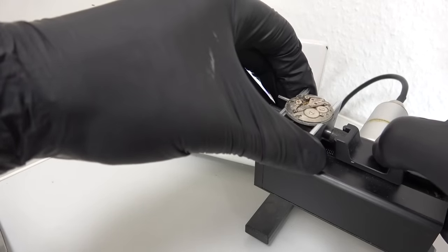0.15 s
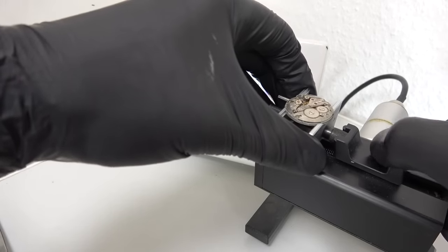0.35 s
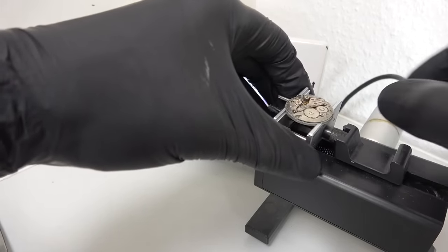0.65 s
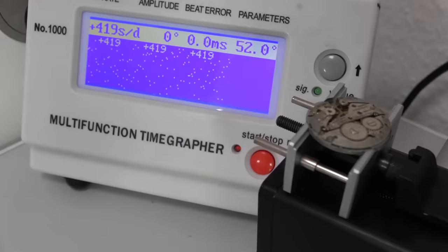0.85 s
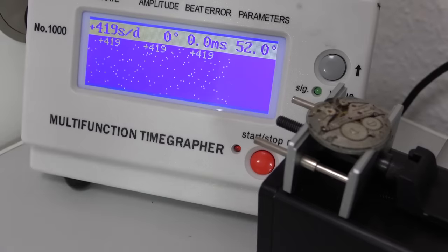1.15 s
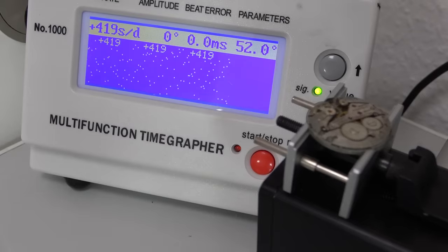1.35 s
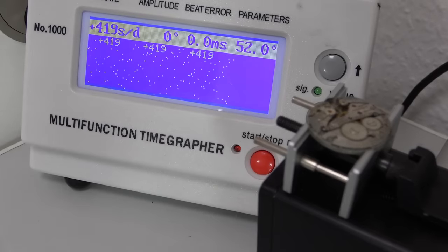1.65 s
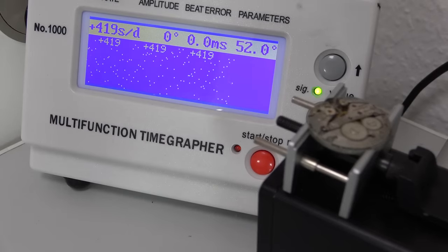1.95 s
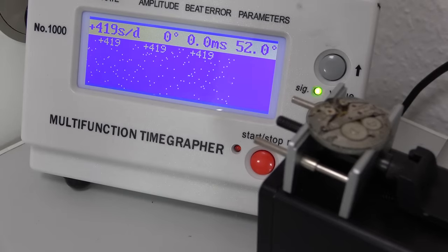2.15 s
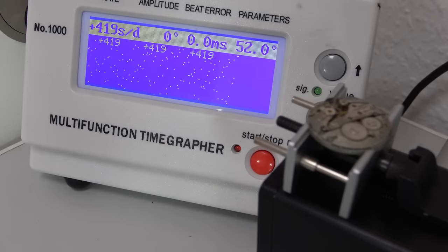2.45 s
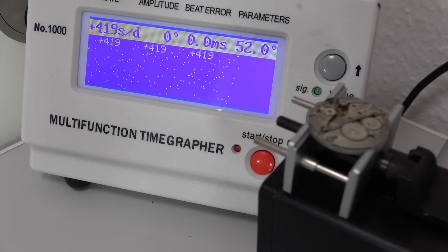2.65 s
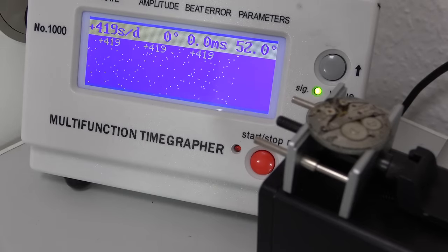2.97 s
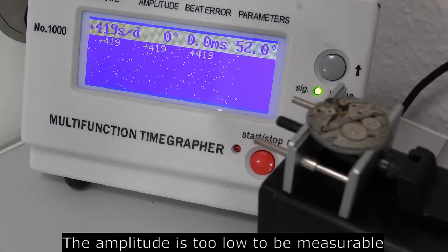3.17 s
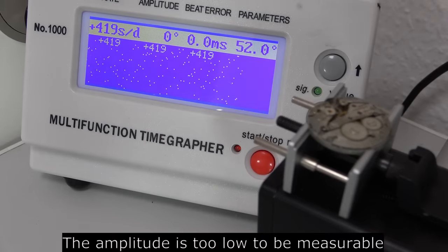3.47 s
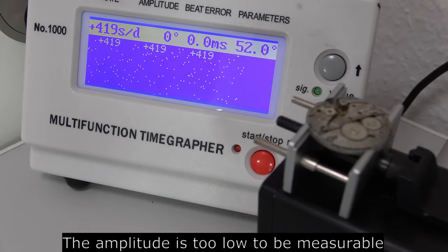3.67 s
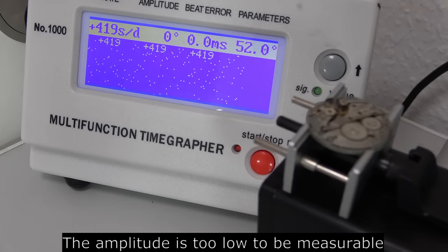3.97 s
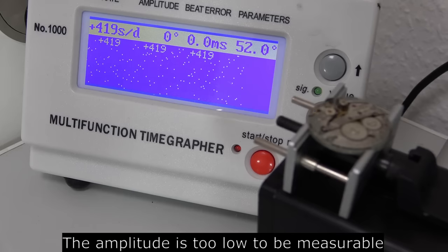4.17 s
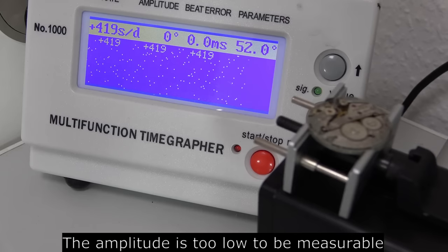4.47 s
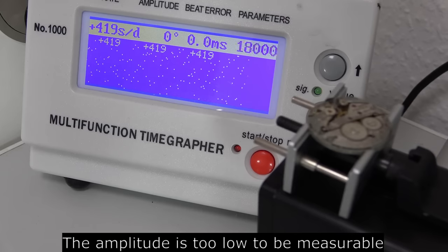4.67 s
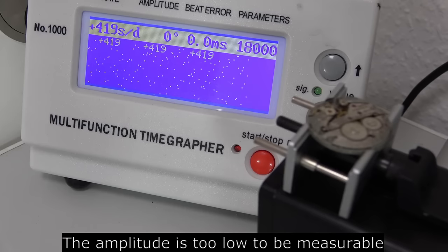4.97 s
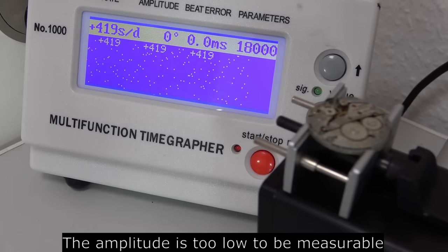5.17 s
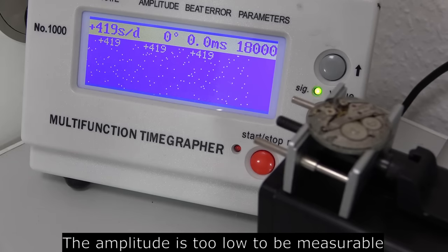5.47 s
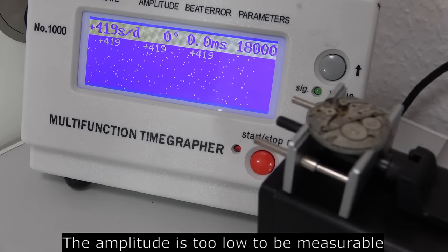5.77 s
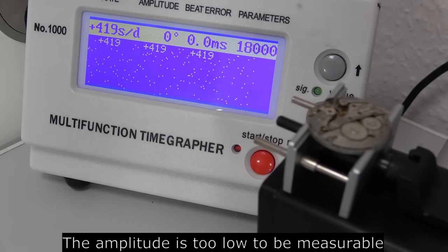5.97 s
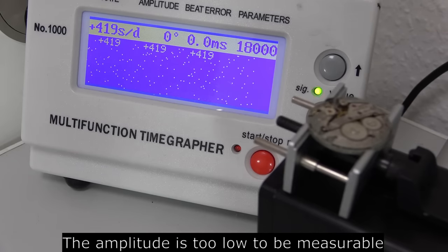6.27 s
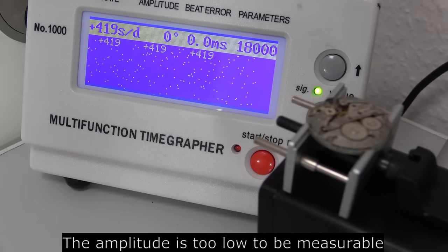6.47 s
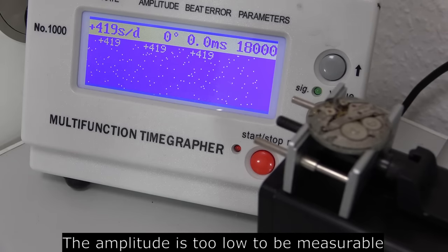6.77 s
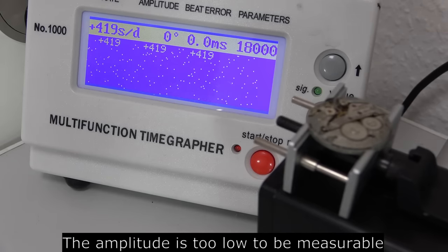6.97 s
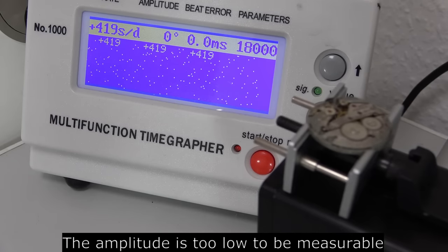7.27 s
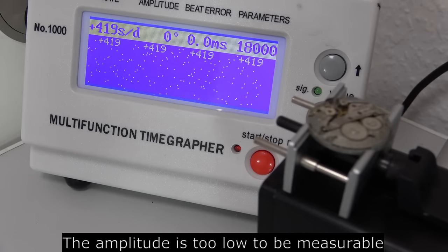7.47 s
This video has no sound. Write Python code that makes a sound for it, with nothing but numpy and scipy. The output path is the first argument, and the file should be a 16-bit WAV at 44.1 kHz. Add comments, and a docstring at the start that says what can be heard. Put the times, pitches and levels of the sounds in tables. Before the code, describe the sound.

After a snap and brief glove rubbing, a watch testing device follows a watch's faint ticks with fast, sharp pips in a small room.

```python
"""Watch on a timegrapher

A clamp snaps shut on a watch movement and a rubber glove hisses off the stand. The scene then jumps
to the running test: about five times a second the steel escapement clicks faintly, and the tester's
buzzer, kicked by a few electric pulses, answers with a sharp pip that rings on in a small room.
Air and a low hum lie underneath, and two early nudges set the microphone's support rumbling."""
import sys
import numpy as np
from scipy import signal
from scipy.fft import rfft, irfft
from scipy.io import wavfile
from scipy.ndimage import uniform_filter1d

SR = 44100
rng = np.random.default_rng(int(sys.argv[2]) if len(sys.argv) > 2 else 0)


def transcribe(u):
    """Save the signal u as a 16-bit wav file named by the first command-line argument.

    u: samples, shape (n,) or (channels, n), limited to [-1, 1]; the rate is SR.
    q: integer samples, one column per channel.
    """
    v = np.clip(np.atleast_2d(u).T, -1, 1)
    q = np.round(v * 32767).astype(np.int16)
    wavfile.write(sys.argv[1], SR, q)


N = 336042

# Colour of the room's air. Each row: frequency in Hz, relative level in dB.
AIR_COLOUR = [(20, -0.5), (45, 3.5), (100, -1.5), (160, 0), (290, -1), (420, -10.5), (750, -9), (1100, -14),
              (1800, -19.5), (3000, -25.5), (6000, -27), (9500, -29), (12000, -32.5), (15500, -32)]
# Hum of an appliance. Each row: frequency in Hz, level in dB.
HUM_TONES = [(122.5, -74.5), (279, -74), (500.6, -80), (711, -67.5), (780.6, -83.5), (1276, -89),
             (1545, -72.5)]
# The room's tail. Each row: frequency in Hz, seconds to fall 60 dB.
ROOM_DECAY = [(300, 0.21), (1500, 0.6), (2400, 0.43), (3800, 0.51), (4900, 0.35), (7000, 0.32),
              (14000, 0.35)]
# Nudges to the microphone's support. Each row: start in seconds, push length in seconds, level in dB.
SUPPORT_NUDGES = [(.011, .16, -33.5), (.614, 0.075, -43)]
# Colour of rubber on plastic. Each row: frequency in Hz, relative level in dB.
RUB_COLOUR = [(880, -37), (1500, -9), (1750, -5), (2920, -13), (3540, -5.5), (4350, -4.5), (5720, -5),
              (8710, -7), (15500, -16)]
# Glove strokes. Each row: firmest moment in seconds, relative level in dB, swell and fade in seconds.
GLOVE_STROKES = [(.036, -54.5, .004, 0.033), (.53, -57.5, 0.056, 0.13), (.75, -61, 0.021, 0.045)]
# Resonances of the stand. Each row: centre in Hz, width in Hz, relative level in dB.
STAND_RESONANCES = [(350, 180, 3), (2540, 740, -2), (5700, 320, -1), (8750, 1400, -4.5)]
# Knocks of clamp and movement. Each row: start in seconds, peak in dB, treble cutoff in Hz.
CLAMP_KNOCKS = [(0.0353, -41, 7860), (0.0733, -23, 6750), (0.1859, -49, 7000), (0.604, -42.5, 3600),
                (.627, -45, 6560), (.6815, -48, 5000), (0.732, -44.5, 7000)]
# Ring of the clamp. Each row: frequency in Hz, relative level in dB, seconds to fall 60 dB.
CLAMP_MODES = [(77.5, -16, 0.22), (376, -12, 0.058), (1150, -13.5, 0.051), (1370, -8, 0.024),
               (1496, -5, 0.038), (1557, -16, 0.21), (2100, -4, 0.0085), (2780, -4, 0.021),
               (3590, 3, 0.0069), (4950, -3, 0.0076), (5650, -8, .01), (6410, -4, 0.01), (8500, -8, 0.0087),
               (13500, 7, .008)]
# Uneven running of the weak movement. Each row: time in seconds, lag behind an even beat in seconds.
BEAT_WANDER = [(0.76, 0.0023), (1.38, 0.0078), (1.59, -0.0002), (1.8, 0.0041), (2.62, -0.0052),
               (2.83, -0.0111), (3.03, -0.003), (3.65, -0.0061), (3.86, 0.0049), (4.48, 0.0136),
               (4.89, 0.0105), (5.1, 0.013), (5.72, 0.005), (5.92, -0.0024), (6.13, -0.0036),
               (6.34, 0.0014), (6.95, -0.0065), (7.57, -0.0042)]
# Ring of the escapement's tiny steel parts. Each row: centre in Hz, width in Hz, relative level in dB.
STEEL_RESONANCES = [(6500, 1500, -24), (9240, 2400, -14), (11800, 1100, -17), (13700, 1400, -14),
                    (14900, 790, -9.5)]
# The buzzer in its plastic case. Each row: centre in Hz, width in Hz, relative level in dB.
BUZZER_RESONANCES = [(493, 300, -31.5), (1463, 198, -15), (2040, 148, -12), (2475, 366, -4.5),
                     (3090, 178, 1.5), (3874, 178, -2.5), (4683, 525, -14.5), (5365, 220, -11.5),
                     (6394, 136, -26), (7603, 340, -25.5), (8715, 300, -28), (11240, 1050, -41.5),
                     (12740, 290, -27), (13740, 556, -51)]
# The buzzer faces away, so most of it arrives off wall and bench.
# Each row: delay in seconds, relative level in dB.
BUZZER_PATHS = [(0.0, -14.5), (0.001481, 3.5), (0.001966, 4), (0.002191, -0.5), (0.003119, 0.8),
                (0.003229, 1.6), (0.003325, -9), (0.004506, -4.5), (0.006981, -7.5), (0.007804, -11.5),
                (0.0112, -9)]
# What the buzzer throws all round the room. Each row: centre in Hz, width in Hz, relative level in dB.
BUZZER_SPILL = [(520, 300, -48.5), (1270, 730, -29.5), (2100, 710, -17.5), (2291, 210, -0.5),
                (2472, 394, -2), (2925, 690, -18), (3950, 630, -20.5), (4627, 870, -12), (4960, 290, -10.5),
                (5320, 510, -26.5), (7250, 5100, -38), (12600, 3800, -40.5)]

FIRST_BEAT_S, BEAT_S, LIMP_S = .765, .2063, .0084  # every second beat is late by the limp
UNLOCK_LEAD_S, DROP_LAG_S, DROP_JITTER_S = .029, .033, .004  # the two clicks around each beat
EARLY_BEATS, EARLY_S = (13, 17), .0251  # on these beats, from 0, the tester fires at the unlocking click


def gain_of(db):
    """Decibels to a gain."""
    return 10 ** (np.asarray(db) / 20)


def unit_rms(x):
    """Scales to rms 1."""
    return x / np.sqrt(np.mean(x ** 2) + 1e-20)


def curve_at(points, hz):
    """Reads a table on a log-frequency axis."""
    f, value = np.transpose(points)
    return np.interp(np.log(hz + 1), np.log(f + 1), value)


def add(mix, start_s, sound):
    """Lays a sound into the mix."""
    part = mix[max(round(start_s * SR), 0):][:len(sound)]
    part += sound[:len(part)]


def noise(colour):
    """Steady noise of rms 1 with the given colour."""
    gains = gain_of(curve_at(colour, np.fft.rfftfreq(N, 1 / SR)))
    return unit_rms(irfft(rfft(rng.standard_normal(N)) * gains, N))


def ring(resonances, size=4096, order=2):
    """A resonant body's answer to one tap; a higher order steepens the skirts of its peaks."""
    hz = abs(np.fft.fftfreq(size, 1 / SR))
    power = sum(gain_of(db) ** 2 / (1 + (2 * (hz - f) / width) ** 2) ** order
                for f, width, db in resonances)
    log_gain = np.log(power + 1e-14) / 2
    return np.fft.ifft(np.exp(np.conj(signal.hilbert(log_gain)))).real  # minimum phase


def delayed(x, delays_s, gains):
    """Stacks delayed copies of a short sound."""
    hz = np.fft.rfftfreq(len(x), 1 / SR)
    comb = gains @ np.exp(-2j * np.pi * np.outer(delays_s, hz))
    return irfft(rfft(x) * comb, len(x))


def room(x, predelay_s=0.0041, build_s=0.0049):
    """Small-room reverb: dense reflections build up, then each band dies at its own speed."""
    taps = rng.choice([-1., 1.], SR) * (rng.random(SR) < .2)
    hz, t, bands = signal.stft(taps, SR, nperseg=256)
    decay = gain_of(-60 * t / curve_at(ROOM_DECAY, hz)[:, None])
    tail = signal.istft(bands * decay, SR, nperseg=256)[1]
    tail *= np.clip((np.arange(len(tail)) / SR - predelay_s) / build_s, 0, 1)
    return signal.fftconvolve(x, tail / np.linalg.norm(tail))[:N]


def room_tone(air_db=-58.5, waver=0.747):
    """The bed: room air and the hum of an appliance, whose higher tones waver more."""
    t = np.arange(N) / SR
    out = gain_of(air_db) * noise(AIR_COLOUR)
    knots = np.linspace(0, t[-1], 150)
    for hz, db in HUM_TONES:
        drift = np.interp(t, knots, np.cumsum(rng.standard_normal(len(knots))))
        phase = 2 * np.pi * hz * t + waver * (hz / 1000) ** 2 * drift
        out += gain_of(db) * np.sqrt(2) * np.sin(phase)
    return out


def support_sway(hz=18.0, settle_s=0.15):
    """Sub rumble: each nudge rocks the microphone's support, which swings at its own rate and settles."""
    t, out = np.arange(2 * SR) / SR, np.zeros(N)
    for start, push, db in SUPPORT_NUDGES:
        swing = np.minimum(t / push, 1) * np.exp(-np.maximum(t - push, 0) / settle_s)
        add(out, start, gain_of(db) * swing * np.sqrt(2) * np.sin(2 * np.pi * hz * t))
    return out


def glove(grain_db=-1.5, hiss_db=1.0, slips_per_s=200, slip_db=-3):
    """Rubber hisses over plastic in strokes that swell and fade; its tiny uneven slips tap the stand."""
    t = np.arange(N) / SR
    grip = unit_rms(uniform_filter1d(rng.standard_normal(N), size=130))
    hiss = unit_rms(noise(RUB_COLOUR) * gain_of(grain_db * grip))
    slips = (rng.random(N) < slips_per_s / SR) * rng.standard_normal(N)
    taps = unit_rms(signal.oaconvolve(slips, ring(STAND_RESONANCES))[:N])
    strokes = sum(gain_of(db) * np.exp(-np.maximum((firmest - t) / swell, (t - firmest) / fade))
                  for firmest, db, swell, fade in GLOVE_STROKES)
    return strokes * (gain_of(hiss_db) * hiss + gain_of(slip_db) * taps)


def clamp(crack_gain=0.98, crack_s=0.0026, room_db=-18):
    """Each knock is a brief crack over the short ring of the clamp, with its own brightness."""
    t, out = np.arange(8192) / SR, np.zeros(N)
    for start, peak_db, cutoff_hz in CLAMP_KNOCKS:
        body = sum(gain_of(db - 60 * t / t60) * np.sin(2 * np.pi * (hz * t + rng.random()))
                   for hz, db, t60 in CLAMP_MODES)
        crack = crack_gain * np.exp(-t / crack_s) * rng.standard_normal(len(t))
        knock = signal.sosfilt(signal.butter(2, cutoff_hz, fs=SR, output="sos"), body + crack)
        add(out, start, gain_of(peak_db) * knock / abs(knock).max())
    return out + gain_of(room_db) * room(out)


def beat_times():
    """The watch's rhythm in seconds: an even count, a limp between tick and tock, and a slow wander."""
    even = np.arange(FIRST_BEAT_S, N / SR, BEAT_S)
    limp = LIMP_S * (np.arange(len(even)) % 2)
    return even + limp + np.interp(even, *np.transpose(BEAT_WANDER))


def escapement(unlock_db=-61, drop_db=-53.5, spread_db=3, chatter_s=0.00095, settle_s=0.006, room_db=-9):
    """A faint steel click as the pallet unlocks, then a stronger, uneven one as the wheel drops on it."""
    t, clicks = np.arange(1024) / SR, np.zeros(N)
    envelope = np.exp(-t / chatter_s) + 0.15 * np.exp(-t / settle_s)
    for beat in beat_times():
        unlock, drop = envelope * rng.standard_normal((2, len(t)))
        lag, force = rng.standard_normal(2)
        add(clicks, beat - UNLOCK_LEAD_S, gain_of(unlock_db) * unlock)
        add(clicks, beat + DROP_LAG_S + DROP_JITTER_S * lag, gain_of(drop_db + spread_db * force) * drop)
    steel = ring(STEEL_RESONANCES)
    ticks = signal.oaconvolve(clicks, steel / np.linalg.norm(steel))[:N]
    return ticks + gain_of(room_db) * room(ticks)


def buzzer(pulses=3, drive_hz=2360.7, peak_db=-8, low_cut_hz=300, room_db=-16):
    """The lead sound: every beat fires the same few electric pulses into the buzzer, making a pip."""
    pip = delayed(ring(BUZZER_RESONANCES), np.arange(pulses) / drive_hz, np.ones(pulses))
    low_cut = signal.butter(2, low_cut_hz, "high", fs=SR, output="sos")  # too small to radiate bass
    path_s, path_db = np.transpose(BUZZER_PATHS)
    pip = delayed(signal.sosfilt(low_cut, pip), path_s, gain_of(path_db))
    pip *= gain_of(peak_db) / abs(pip).max()
    spill = unit_rms(ring(BUZZER_SPILL, order=4)) * pip.std()
    close, room_send = np.zeros((2, N))
    for number, beat in enumerate(beat_times()):
        start = beat - EARLY_S * (number in EARLY_BEATS)
        add(close, start, pip)
        add(room_send, start, spill)
    turn = np.linspace(0, np.pi, N)  # the reflections drift slowly through three patterns
    crossfades = np.maximum(np.cos(turn), 0), np.sin(turn), np.maximum(-np.cos(turn), 0)
    return close + gain_of(room_db) * sum(fade * room(room_send) for fade in crossfades)


def scene(jump_s=.78, crossfade_s=.006):
    """Handling first, then an abrupt jump into the running test, over one unbroken bed; mono."""
    jump = np.clip((np.arange(N) / SR - jump_s) / crossfade_s, 0, 1)
    handling = clamp() + glove()
    testing = buzzer() + escapement()
    return ((1 - jump) * handling + jump * testing + support_sway() + room_tone())[None]


def record(dry, cutoff_hz=16000):
    """A steep high cut takes the very top off the mix."""
    high_cut = signal.firwin(511, cutoff_hz, window=("kaiser", 9), fs=SR)
    return signal.oaconvolve(dry, high_cut[None], "same")


dry = scene()
out = record(dry)
transcribe(out)
```